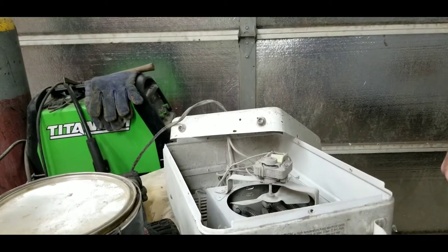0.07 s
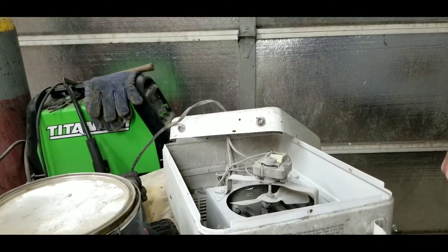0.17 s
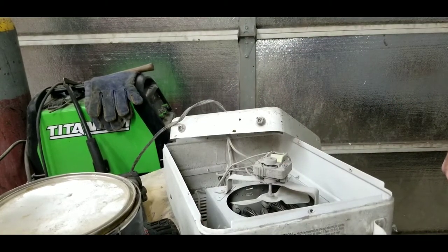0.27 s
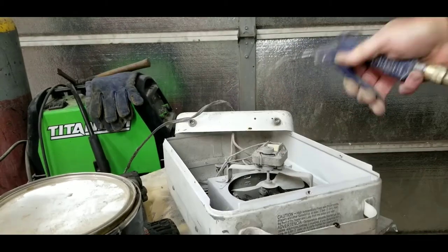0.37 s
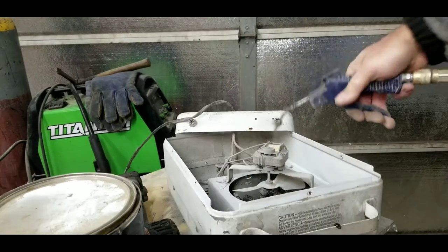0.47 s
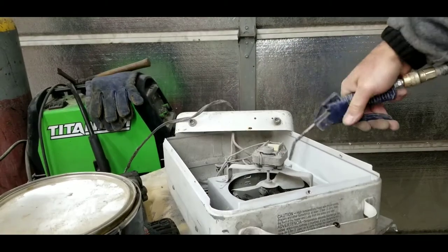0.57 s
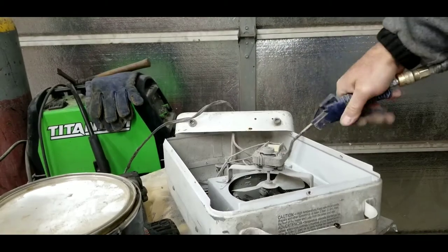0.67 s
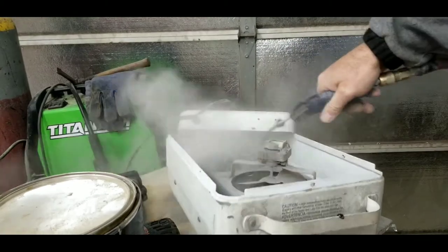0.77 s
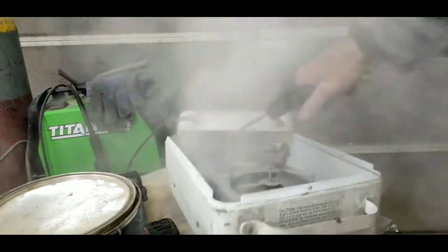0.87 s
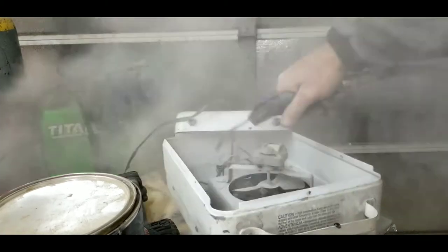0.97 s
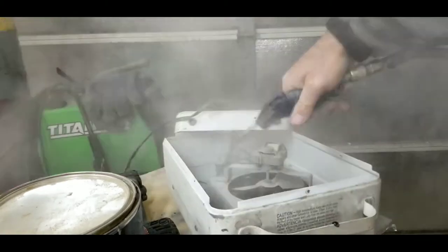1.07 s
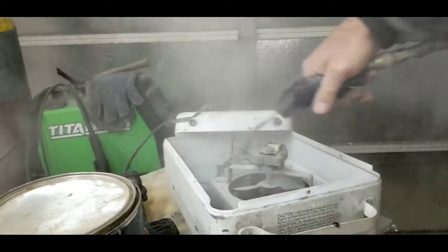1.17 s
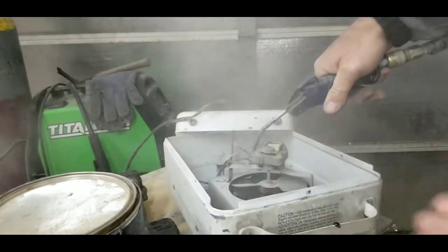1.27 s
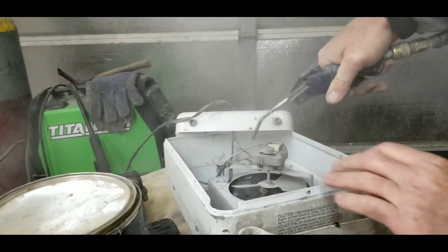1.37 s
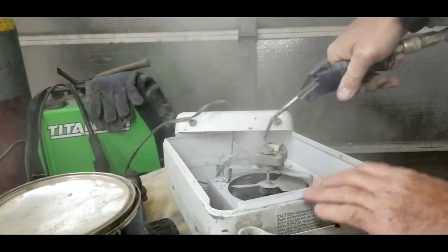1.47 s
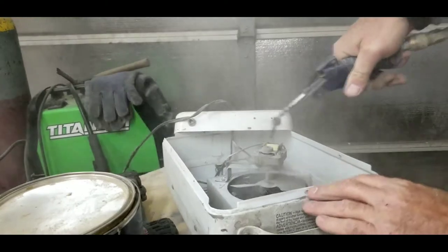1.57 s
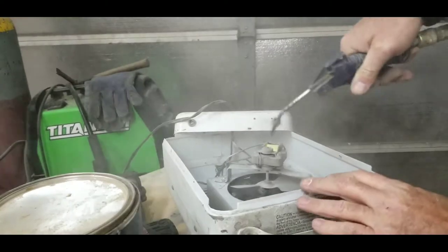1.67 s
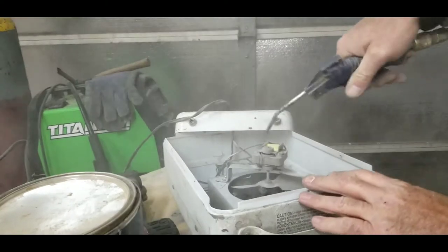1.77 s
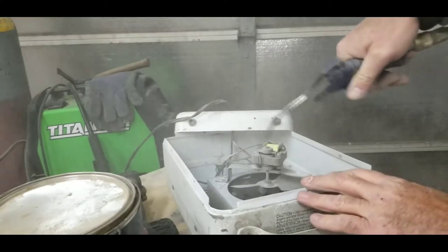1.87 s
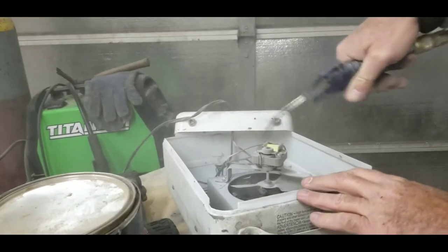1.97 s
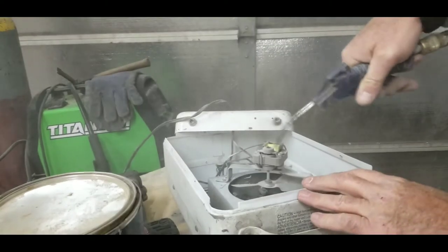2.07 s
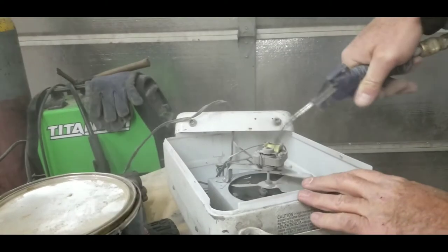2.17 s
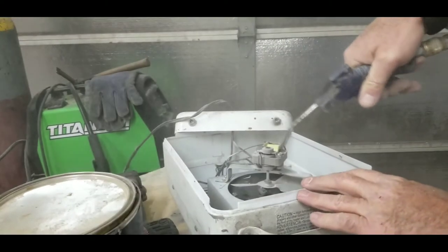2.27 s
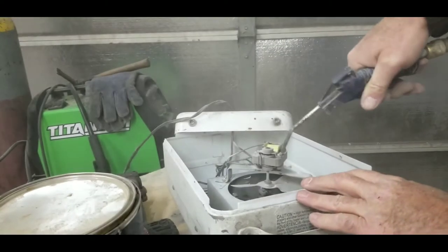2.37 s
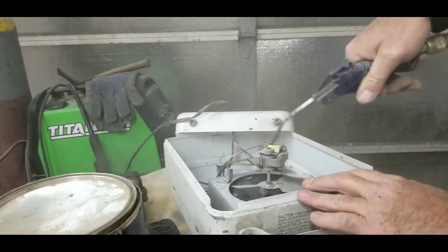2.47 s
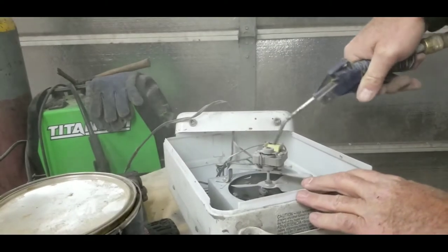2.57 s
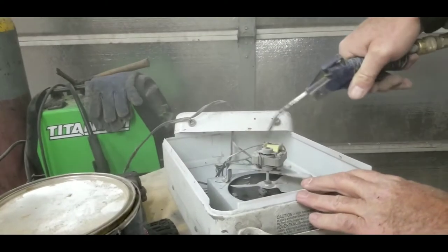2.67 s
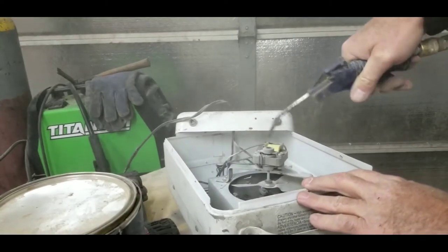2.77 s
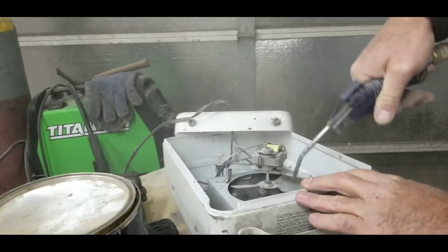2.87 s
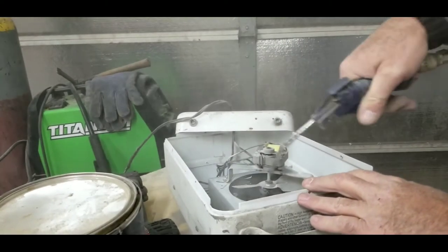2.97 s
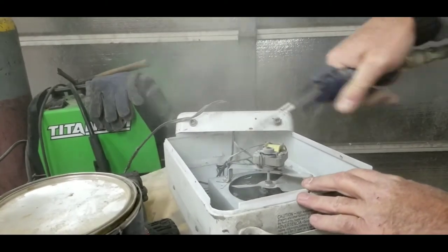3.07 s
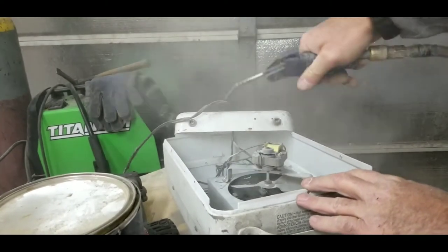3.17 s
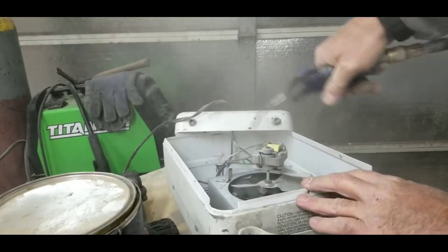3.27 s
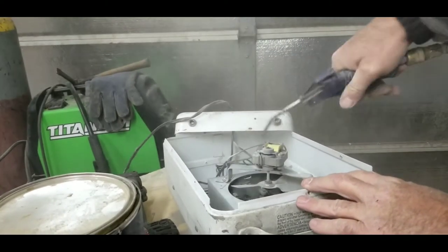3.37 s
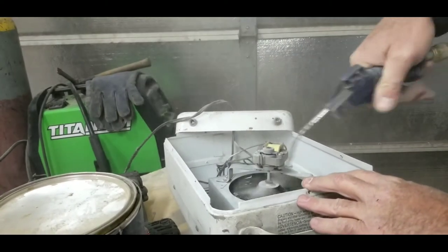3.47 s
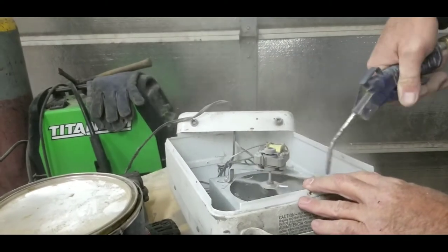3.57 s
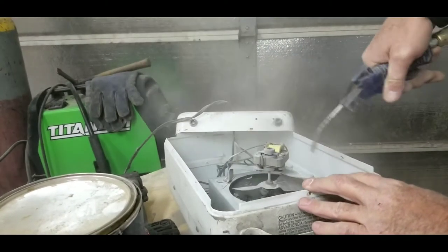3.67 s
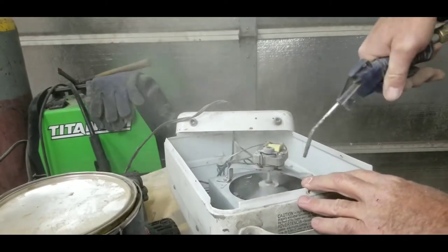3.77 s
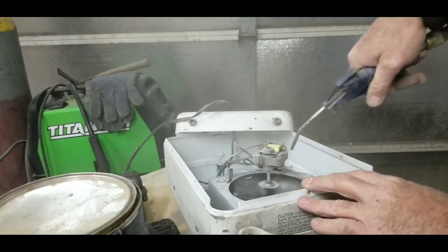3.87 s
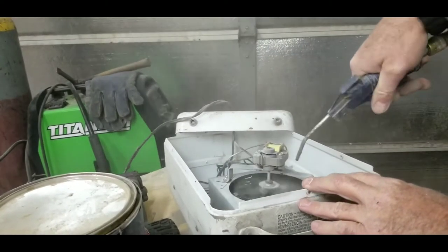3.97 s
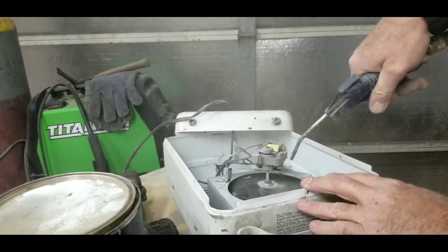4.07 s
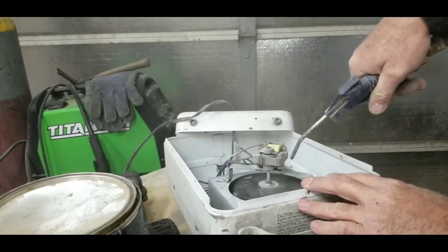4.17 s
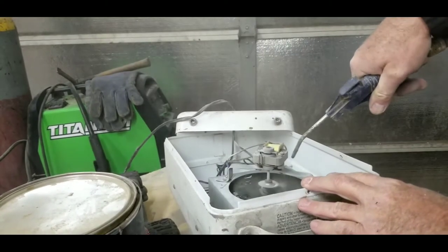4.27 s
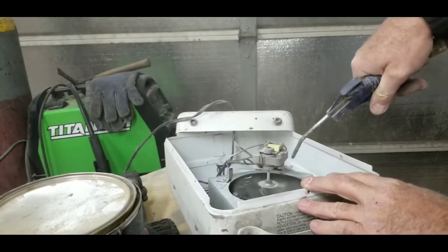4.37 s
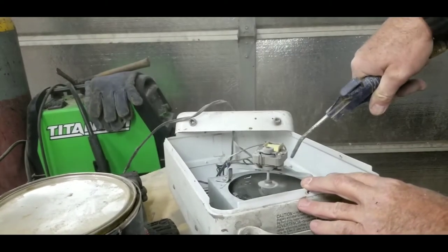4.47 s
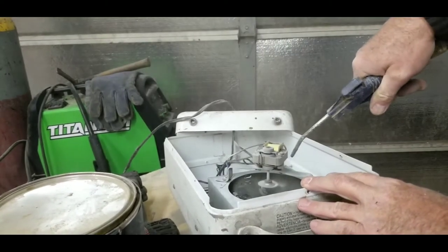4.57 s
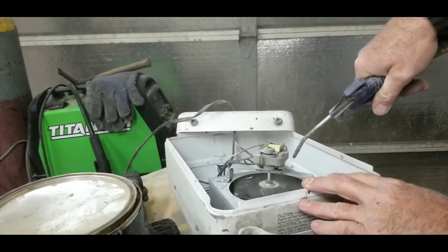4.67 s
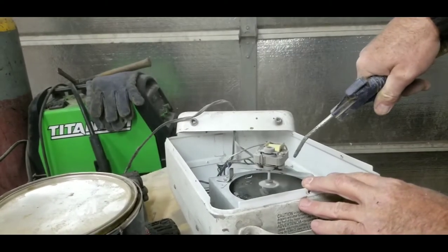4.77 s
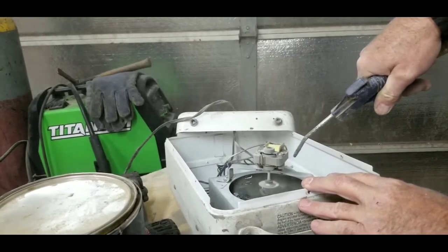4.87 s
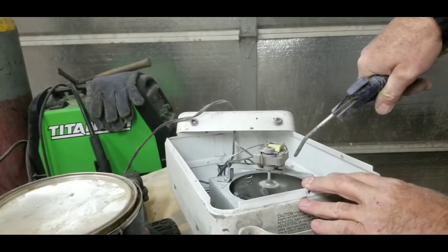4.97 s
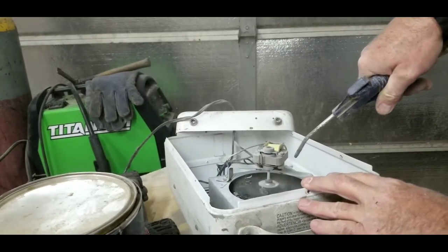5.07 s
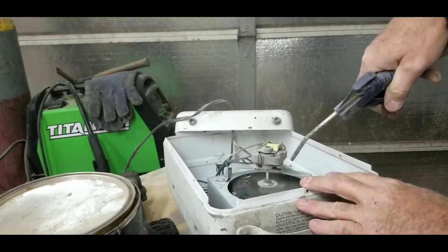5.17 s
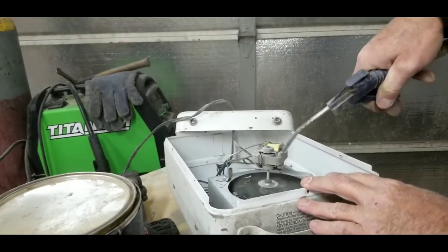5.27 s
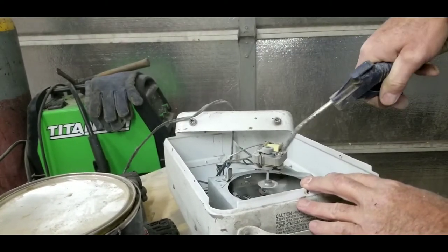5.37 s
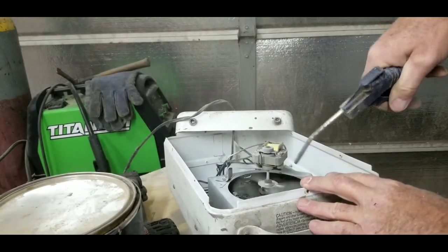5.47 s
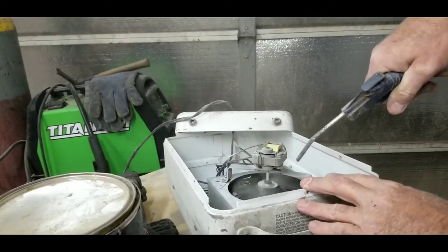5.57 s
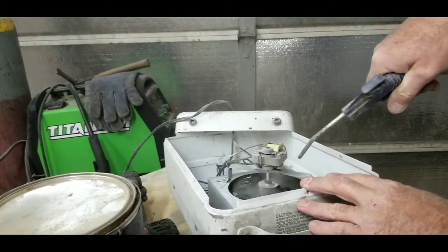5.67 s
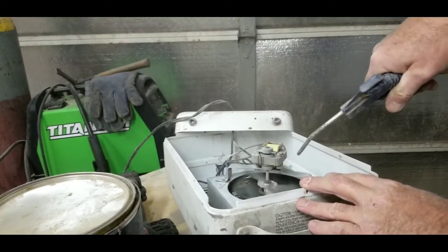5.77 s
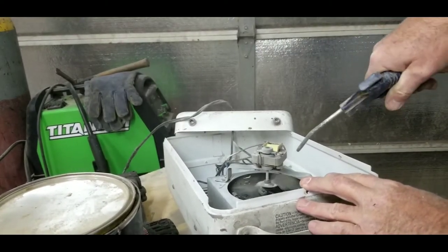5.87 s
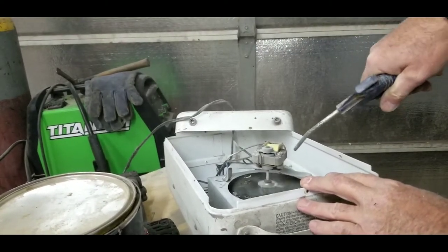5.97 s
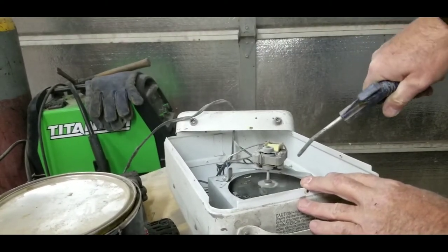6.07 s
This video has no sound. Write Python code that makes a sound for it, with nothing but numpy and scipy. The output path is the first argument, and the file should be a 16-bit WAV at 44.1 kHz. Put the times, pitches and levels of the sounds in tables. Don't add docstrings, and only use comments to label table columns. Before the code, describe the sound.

For the first 0.34 s there is only quiet low room rumble, faint rustle and tiny knocks; it drops abruptly to near silence. Around 0.5 s a thin air leak swells, and at 0.67 s a compressed-air gun snaps open with a dull thump. Its loud, bright hiss and roar swing unevenly until about 2.8 s, with fast swishes, flicks on wires and edges, and hollow booms in the metal box. From 2.8 to 3.9 s the blasts are longer and fuller. From 4.0 s the jet chops on fan blades, which climb quickly into a buzzy siren whine, steady from about 4.5 s. At 5.15 s the air stops sharply; the coasting rotor stirs soft air with tiny wavering whistles. A brief near-hush precedes another fluctuating blast at 5.49 s, faintly catching the fan again near 6 s. Close stereo microphones, modest garage echo.

```python
import sys
import numpy as np
from scipy import signal
from scipy.fft import rfft, irfft, next_fast_len
from scipy.io import wavfile
from scipy.ndimage import uniform_filter1d, map_coordinates

SR = 44100
rng = np.random.default_rng(int(sys.argv[2]) if len(sys.argv) > 2 else 0)


def store_pcm(level_fs):
    pcm = np.round(np.clip(level_fs, -1, 1) * 32767).astype(np.int16)
    wavfile.write(sys.argv[1], SR, np.atleast_2d(pcm).T)


def boost(x):
    u = np.asarray(x, float) / 20
    return 10 ** u


N = 270333

# opens [t/s], closes [t/s], attack [s]
TRIGGER = [
    (0.667, 5.152, 0.0086),
    (5.488, 6.2, 0.022),
]
RELEASE_S = 0.04
# hiss, roar, boom [level/dB]
FREE_JET_DB = [-50, -75, -65.5]
GLIDE_S = 0.026
# [t/s], length [s], roar [level/dB], aimed
# at the microphones [level/dB re roar], into the box [level/dB re roar]
LANDINGS = [(0.651, 0.162, -43, 4.5, -10), (0.803, 0.031, -54.5, 9, -6), (0.84, .05, -43, 3, -8.5),
            (0.89, 0.128, -40.5, 1.5, -8.5), (1.081, 0.086, -40.5, -2, -10.5), (1.246, 0.12, -39.5, -3, -19),
            (1.35, 0.093, -42.5, -4, -14.5), (1.529, 0.068, -47.5, 1.5, -8), (1.635, 0.06, -53.5, 9.5, -0.5),
            (1.74, .06, -55, 11, -8), (1.82, 0.55, -62, 14, -5), (1.02, .06, -64, 15, -4),
            (1.44, .09, -64, 14, -4), (1.69, .05, -64, 16, -4), (2.36, .05, -64, 13, -4),
            (2.31, 0.049, -44, -13, -10), (2.408, 0.064, -44.5, 7.5, -7.5), (2.487, 0.086, -54, 11, -3),
            (2.587, 0.042, -53, 4, -1), (2.661, 0.12, -52, 9, -7),
            (2.785, .025, -57, 7, -5), (2.809, .1, -46, 7, -10), (2.905, .03, -50, 7, -6),
         (3.08, .03, -50, 7, -6), (2.93, 0.15, -40, -1.5, -13.5), (3.1, 0.055, -50, 6.5, 1),
         (3.16, 0.097, -44.5, -1, -7), (3.26, .12, -43, 2, -11.5), (3.385, .06, -39.5, -2, -10),
         (3.445, .065, -41.5, -.5, -12), (3.52, .03, -45, 3, -11), (3.55, 0.035, -41, -5, -16),
         (3.585, .03, -47, 4, -15), (3.62, 0.045, -47, 1, -18), (3.665, .03, -43, 2, -11),
         (3.689, 0.076, -41.5, 3.5, -11), (3.765, .04, -64, 16, -4), (3.805, 0.033, -48.5, 7, -6),
         (3.841, 0.1, -37, -2, -18), (3.949, 0.46, -48, 7, -4.5), (4.4, 0.692, -43, 2, -9),
         (5.09, .12, -50, 8, -9), (5.46, 0.18, -42.5, 4, -12.5), (5.64, 0.06, -52, 12, -3),
         (5.7, .055, -51, 11, -11), (5.755, .105, -52, 12, -1), (5.76, .03, -60, 0, 10),
         (5.85, 0.071, -41.5, 3, -8), (5.92, 0.046, -49.5, 7, 0), (5.965, .03, -56, 0, 10),
         (5.98, 0.21, -39.5, -.5, -9)]
# [t/s], peak [level/dB], length [s], above 9 kHz [level/dB], under 1.5 kHz [level/dB]
SWIPES = [(0.726, -35, 0.013, -8, -12), (0.742, -36, 0.042, -12, -16), (0.781, -32.5, .028, -3, -14),
          (0.9, -35.5, 0.055, -10, -22), (0.976, -37.5, 0.016, -9, -7), (1.451, -38, 0.027, 4, -10),
          (1.515, -39, 0.013, 5, -5), (1.745, -42, 0.012, 3, -13), (1.773, -31.5, 0.014, -1, -9),
          (1.876, -33, 0.01, -3, -10), (1.885, -27.5, 0.012, -0.5, -13.5), (1.902, -40, .01, 0, -12),
          (2.025, -44, .015, 0, -12), (2.008, -34, .014, -2, -16), (1.987, -30, 0.037, -4, -18.5),
          (2.096, -27.5, 0.028, -1, -22), (2.125, -39, .022, -3, -14), (2.175, -64, 0.018, 7, -14),
          (2.204, -33, .01, -3, -8), (2.212, -28, 0.028, -0.5, -16), (2.243, -38, .01, -3, -12),
          (2.306, -37, .015, 0, -6), (2.343, -39, 0.015, 7, -11), (2.559, -41, 0.01, 10, -6),
          (2.621, -36, .012, -3, -12), (2.628, -24, 0.034, -7, -20), (2.664, -35, .012, -3, -14),
          (2.756, -34, 0.025, 2, -8), (2.811, -36, 0.01, 9, -9), (3.182, -31, 0.019, -20, -18),
          (3.209, -30, 0.036, -16, -19), (3.331, -44, .02, 13, -4), (5.801, -43, 0.018, -8, 3.5),
          (5.861, -38.5, 0.016, 9, -4)]
# [t/s], peak [level/dB], under 1.5 kHz [level/dB]
FLICKS = [(1.687, -38, -14), (1.794, -39, -16), (1.988, -31, -8), (2.015, -39, -13), (2.096, -35, -8),
          (2.15, -45, -6), (2.261, -37, -14), (2.713, -30, -9), (2.565, -38, -6), (2.818, -33, -14),
          (.928, -36, -14), (1.46, -42, -8), (5.996, -37, -2), (6.047, -36, -3), (6.068, -38, -3),
          (6.087, -35, -4), (2.965, -33, -16), (3.43, -35, -8)]
FLICK_S = 0.0023
# [f/Hz], [level/dB per Hz]
NOZZLE = [(880, -34), (1500, -23.5), (2310, -9), (5050, -6), (6500, -1.5), (8480, -2), (10400, 0.5),
          (12100, 0), (15600, -2)]
# [f/Hz], [level/dB per Hz]
ROAR = [(290, -100), (500, -23.5), (1190, -9), (2160, 2), (3100, -4), (3500, -6.5), (5500, 1), (7500, -3),
        (8470, -14), (9000, 1), (11700, -23), (19800, -120)]
# [f/Hz], [level/dB per Hz]
BOOM = [(15, -66), (25, -52), (108, -31), (170, -20), (286, -14), (323, -13.5), (457, -7.5), (798, -8.5),
        (1090, -3.5), (1440, -6.5), (1600, -8.5), (2080, -5.5), (3520, -120)]
# [f/Hz], correlation [-1 to 1]
ALIKE = [(60, 0.69), (99, 0.38), (160, 0.43), (270, 0.49), (450, 0.42), (740, 0.51), (1220, 0.61),
         (2010, 0.58), (3330, 0.53), (5500, 0.26), (9080, -0.1), (15000, 0.3)]
# [f/Hz], width [Hz], [level/dB]
SHEET_METAL = [(1120, 96, 2.2), (3120, 190, 2), (3730, 110, 1.5), (5070, 80, 1), (6700, 150, -4)]
FLOOR_SHARE = 0.38
# [t/s], delay [ms]
FLOOR_PATH = [(.67, 0.27), (1.0, 0.25), (1.3, 0.25), (1.65, 0.25), (1.9, 0.24), (2.2, 0.28), (2.33, 0.18),
              (2.65, 0.26), (3.2, 0.28), (3.45, 0.27), (3.9, .2), (4.5, 0.25), (5.15, 0.17), (5.6, 0.2),
              (6.1, 0.26)]
# [t/s], resonance [f/Hz], [level/dB]
POCKET = [(0.68, 4970, 3.5), (0.77, 3820, 3), (1.58, 4330, 4), (1.63, 5050, 3), (2.04, 4300, 2.5),
          (2.07, 4970, 6), (2.33, 4080, 2), (2.44, 5190, 6), (2.58, 4980, 4), (2.62, 3880, 2),
          (2.84, 5100, 6), (2.92, 3920, 3), (2.97, 4800, 3), (3.23, 3430, 5), (3.35, 5100, 3),
          (3.53, 3680, 3), (3.8, 5230, 4), (4.0, 4550, 3)]
POCKET_Q = 3.1

# [t/s], blade rate [f/Hz]
SPEED = [(3.99, 95.15), (4.048, 113.7), (4.142, 145.1), (4.242, 166.4), (4.382, 185.2), (4.542, 193.5),
         (4.614, 195.6), (5.304, 193.6), (5.396, 194), (5.47, 184)]
# [t/s], blade rate [f/Hz]
RESPIN = [(5.97, 62.1), (6.08, 106), (6.13, 129)]
# [t/s], grip [level/dB], slant lifting middle tones [level/dB], bite lifting top tones [level/dB]
GRIP = [
    [(3.99, -81, 10, -4), (4.05, -75, 11.5, -6), (4.11, -65.5, 1.5, -2), (4.17, -60, 3, -4),
     (4.215, -59, 2, 3), (4.26, -56.5, 4, 0), (4.37, -56, 2.5, -5), (4.45, -55.5, 3, 4),
     (4.542, -54, 1, -0.5), (4.65, -52, 0.5, 2), (4.75, -53, -3, -2), (4.85, -53.5, 0, -6),
     (4.95, -54.5, 3.5, -2), (5.03, -55, 0, 0), (5.11, -55, -12, 8), (5.14, -84, -22, 0),
     (5.2, -92, -22, 0), (5.29, -85, -16, 0), (5.38, -86, -16, 0), (5.46, -95, -10, 0)],
    [(5.97, -92, 4, 0), (6.03, -77, 16, 6), (6.08, -76, 15, 5), (6.13, -74, 17, 3)],
]
# multiple of blade rate [1], [level/dB]
BLADE = [(1, -21.5), (2, -2), (3, -8), (4, -6), (5, -1.5), (6, -13), (7, -11.5), (8, -10), (9, -18.5),
         (10, -19), (11, -15)]
# [f/Hz], width [Hz], [level/dB]
HOLLOW = [(150, 35, -3), (280, 22, 7.5), (334, 11, -11), (372, 5, -6), (395, 33, 7), (516, 36, 11),
          (573, 4.7, -20), (740, 10, -18), (952, 60, 8.5), (982, 4, -8), (1134, 40, 13), (1359, 5, -16),
          (1520, 53, 4)]
# [f/Hz], [level/dB per Hz]
SHAKE = [(40, -30), (70, -18), (100, 5), (140, -1), (220, -4), (400, -60)]

# [t/s], length [s], from [f/Hz], to [f/Hz], [level/dB], pitch swing per turn [0-1]
WHISTLE = [(5.2, .04, 1120, 1240, -76, .02), (5.245, .055, 1260, 1140, -76, .025),
           (5.33, .045, 1120, 1080, -71, 0), (5.41, .045, 800, 900, -73, .01),
           (5.455, .03, 770, 740, -77, 0), (5.2, .06, 3720, 3650, -69, .01),
           (5.265, .095, 3400, 3220, -66, .07), (5.362, .008, 2800, 2750, -71, 0),
           (5.378, .024, 3220, 3100, -67, .02), (5.42, .02, 3800, 3620, -68, 0),
           (5.457, .02, 3760, 3850, -72, 0), (5.262, .045, 3620, 3580, -69, 0),
           (5.31, .055, 3420, 3370, -69, 0), (5.375, .025, 6350, 6400, -74, 0),
           (5.32, .03, 5150, 5500, -77, .02), (5.405, .045, 2520, 2720, -74, .02),
           (5.455, .02, 2300, 2280, -76, 0), (5.44, .015, 4450, 4450, -79, 0)]
SHAFT_HZ, SHAFT_S = 44.5, 5.274

# [t/s], [level/dB], ring [f/Hz], t60 [s]
KNOCKS = [(0.178, -75, 770, .2), (0.18, -73, 587, .08), (0.268, -74, 444, .08), (0.305, -74, 800, 0.11),
          (0.325, -69, 550, 0.046), (0.6684, -35, 9700, 0.0063), (0.682, -53, 191, 0.045),
          (0.683, -54, 300, 0.035), (0.468, -76, 2150, 0.048)]
# [f/Hz], t60 [s]
GARAGE = [(150, 0.32), (300, 0.87), (2000, 0.33), (9000, 0.45), (15000, 0.32)]

# [f/Hz], [level/dB per Hz]
RUMBLE = [(12, -41), (20, -15), (59, 0.5), (118, -3.5), (209, -21), (228, -21.5), (600, -26), (780, -68),
          (1320, -120)]
# [f/Hz], [level/dB per Hz]
MURMUR = [(18, -46), (30, -23), (140, 3), (321, -10), (346, -24), (600, -13), (780, -36), (1320, -120)]
# [t/s], [level/dB]
ROOM = [(0, -72), (.15, -71), (.19, -65), (.29, -64), (.334, -70)]
# [t/s], rise [s], [level/dB], t60 [s], brightness [level/dB]
RUSTLES = [(.172, 0.017, -75, 0.32, -3), (.29, .045, -89, 1.1, 4), (.467, .001, -78.5, 0.16, -2)]
# [f/Hz], [level/dB per Hz]
LEAK = [(150, -49), (250, -16), (991, -1.5), (1090, -5.5), (1470, -3.5), (2020, -4), (11000, -11),
        (14300, -41), (22000, -120)]
# [t/s], [level/dB]
VALVE = [(.41, -106), (.467, -97), (.492, -86), (.502, -80), (.509, -66), (.55, -62.5), (.59, -60),
         (.63, -62.5), (.66, -70)]
LEAK_BRIGHTENS = 3.7
# [f/Hz], [level/dB per Hz]
COAST = [(150, -70), (250, -27), (377, -34), (734, -31), (1130, -14), (1530, -28), (1950, -16), (3300, -17),
         (4320, -14.5), (11000, -21.5), (14300, -56), (22000, -120)]
# [t/s], rise [s], [level/dB], t60 [s]
HISS_SWELL = (4, 0.7, -59, .3)
SEEP = (5.25, .08, -83, 1.2)
HUSH_DB = [-81, -85.5]
CUT_S, SHUT_S = 0.339, 5.462

# [f/Hz], [level/dB]
LEAN = [(60, -3), (180, -1), (550, -0.5), (1650, 0.0), (4970, -0.5), (15000, -2)]
TOP_HZ = 15670


def unit(x):
    return x / np.sqrt(np.mean(x ** 2) + 1e-20)


def along(points, hz):
    f, v = np.transpose(points)
    return np.interp(np.log(hz + 1), np.log(f + 1), v)


def peaks(table, hz):
    return sum(db / (1 + ((hz - centre) / width) ** 2) for centre, width, db in table)


def curves(tables):
    t = np.arange(N) / SR
    s, *columns = np.transpose(np.concatenate(tables))
    gate = sum((t >= rows[0][0]) & (t <= rows[-1][0] + 0.011) for rows in tables) > 0
    return [np.interp(t, s, column) for column in columns] + [uniform_filter1d(gate * 1.0, size=60)]


def wobble(rate, size=N):
    knots = rng.standard_normal(int(size * rate / SR) + 4)
    return map_coordinates(knots, [np.arange(size) * rate / SR])


def puff(s, rise, db, t60):
    t = np.arange(N) / SR - s
    return np.clip(t / rise, 0, 1) * boost(db - 60 * np.clip(t - rise, 0, 9) / t60)


def filtered(x, response):
    m = next_fast_len(N + SR // 2)
    return irfft(rfft(x, m) * response(np.fft.rfftfreq(m, 1 / SR)), m)[..., :N]


def rush(spectrum, alike, patchy_db):
    z = signal.stft(rng.standard_normal((2, N)), nperseg=256)[2]
    patches = uniform_filter1d(rng.standard_normal(z.shape[1:]), size=5, axis=0)
    patches = uniform_filter1d(patches, size=10, axis=1)
    pair = signal.istft(z * boost(patchy_db * unit(patches)), nperseg=256)[1][:, :N]

    def response(hz):
        turn = np.arccos(np.clip(along(alike, hz), -1, 1)) / 2
        return boost(along(spectrum, hz)) * [np.cos(turn), np.sin(turn)]

    mid, side = filtered(pair, response)
    return unit(np.array([mid + side, mid - side]))


def jet(chop):
    (face, land, box), valve = aim()
    edge, bright, deep = swipes()
    nick, thud = flicks()
    shake = wobble(35)
    metal = lambda hz: boost(peaks(SHEET_METAL, hz))
    ringing = pocket(bounced(filtered(rush(ROAR, ALIKE, patchy_db=2.45), metal)))
    hollow_air = filtered(rush(BOOM, ALIKE, patchy_db=1.5), metal)
    hiss = np.hypot(face * boost(3.0 + 0.1 * shake), 1.24 * bright) * rush(NOZZLE, ALIKE, patchy_db=2.0)
    roar = np.hypot(land * boost(-3.5 + 1.66 * shake), edge + nick) * ringing
    boom = np.hypot(box * boost(-3.5 + 2.53 * wobble(30)), deep + thud) * hollow_air
    return valve * (chop * (hiss + roar) + boom)


def aim():
    t = np.arange(N) / SR
    power = boost(FREE_JET_DB)[:, None] ** 2 * np.ones(N)
    for s, length, db, face_db, deep_db in LANDINGS:
        span = slice(round((s - GLIDE_S) * SR), round((s + length + GLIDE_S) * SR))
        inside = np.minimum(t[span] - s, s + length - t[span])
        share = np.clip(inside / GLIDE_S + 0.5, 0, 1)
        power[:, span] += boost(db + np.array([[face_db], [0], [deep_db]])) ** 2 * share ** 1.26
    valve = 0
    for opens, closes, attack in TRIGGER:
        release = boost(-60 * np.clip(t - closes, 0, 9) / RELEASE_S)
        valve = valve + np.clip((t - opens) / attack, 0, 1) ** 2 * release
    return np.sqrt(power), valve


def swipes():
    gains = np.zeros((3, N + SR))
    t = np.arange(SR // 5) / SR
    for s, db, length, bright_db, deep_db in SWIPES:
        shape = np.clip(t / 0.0065, 0, 1) * boost(-60 * np.clip(t - length, 0, 1) / 0.024)
        levels = boost(db - 9.0 + np.array([[0], [bright_db], [deep_db]]))
        gains[:, round((s - 0.003) * SR):][:, :len(t)] += levels * shape
    return gains[:, :N]


def flicks():
    gains = np.zeros((2, N + SR))
    t = np.arange(SR // 50) / SR - 4 * FLICK_S
    bump = np.exp(-0.5 * (t / FLICK_S) ** 2)
    for s, db, deep_db in FLICKS:
        levels = boost(db - 11.5 + np.array([[0], [deep_db]]))
        gains[:, round((s - 3 * FLICK_S) * SR):][:, :len(t)] += levels * bump
    return gains[:, :N]


def bounced(x):
    t = np.arange(N)
    late = t - curves([FLOOR_PATH])[0] * SR / 1000
    return unit(x + FLOOR_SHARE * np.array([np.interp(late, t, side) for side in x]))


def pocket(x):
    hz, t, z = signal.stft(x, SR, nperseg=256)
    s, centre_hz, db = np.transpose(POCKET)
    off = (hz[:, None] / np.interp(t, s, centre_hz) - 1) * POCKET_Q
    gain = boost(np.interp(t, s, db) / (1 + off ** 2))
    return unit(signal.istft(z * gain, SR, nperseg=256)[1][:, :N])


def fan():
    rate_hz, on = curves([SPEED, RESPIN])
    low_db, slant_db, bite_db, _ = curves(GRIP)
    turn = 2 * np.pi * np.cumsum(rate_hz * (1 + 0.0007 * wobble(17))) / SR
    go = int(SPEED[0][0] * SR)
    tones = 0
    for k, db in BLADE:
        upper = np.clip((k - 2) / 3, 0, 1)
        grip_db = (low_db + upper * slant_db + (k > 5) * bite_db)[go:]
        hollow_db = peaks(HOLLOW, k * rate_hz[go:]) - peaks(HOLLOW, k * 195.2)
        level = boost(db + grip_db + hollow_db + 1.1 * wobble(16, size=N - go))
        tones = tones + level * np.cos(k * turn[go:] + 0.2 * wobble(9, size=N - go))
    siren = on * boost(5.5) * np.pad(tones, (go, 0)) * boost([[-0.6], [0.6]])
    chop = 1 + np.clip(boost(low_db + 37), 0, 0.6) * on * (np.cos(turn) + 0.5 * np.cos(2 * turn))
    return siren + judder(rate_hz, low_db, on), chop


def judder(rate_hz, low_db, on):
    shove = sum(puff(s, 0.01, -84, 1.2) for s, *_ in TRIGGER) + puff(TRIGGER[0][0], 0.008, -72, 0.6)
    spin = on * boost(low_db - 25) * (rate_hz / 195) ** 12
    return (spin + shove) * rush(SHAKE, [(60, 0.66)], patchy_db=3.0)


def whistle():
    out = np.zeros((2, N))
    for s, length, from_hz, to_hz, db, swing in WHISTLE:
        start = s - 0.006
        n = round((length + 0.013) * SR)
        shaft = np.cos(2 * np.pi * SHAFT_HZ * (start - SHAFT_S + np.arange(n) / SR))
        pitch_hz = np.linspace(from_hz, to_hz, n) * (1 + swing * np.tanh(2.5 * shaft))
        carrier = np.exp(2j * np.pi * np.cumsum(pitch_hz) / SR)
        width = 0.06 * to_hz
        flutter = np.array([1.2 + wobble(width, size=n) + 1j * wobble(width, size=n) for _ in range(2)])
        flutter = flutter + 0.5 * flutter[::-1]
        rub = signal.windows.tukey(n, 0.3) * boost(db - 9.5) * (1 + 0.6 * shaft)
        out[:, round(start * SR):][:, :n] += rub * (flutter * carrier).real
    return out


def knocks():
    out, t = np.zeros(N + SR), np.arange(SR // 3) / SR
    for s, db, hz, t60 in KNOCKS:
        ring = boost(db - 60 * t / t60) * np.sin(2 * np.pi * hz * t)
        out[round(s * SR):][:len(t)] += ring * (1 - np.exp(-t * hz / 0.5))
    return out[:N]


def bench(x):
    out, angle = 0, np.pi * 0.6 * wobble(2.6)
    for share in (np.cos(angle), np.sin(angle)):
        delays = rng.uniform(0.000611, 0.011, (2, 7))
        sizes = rng.uniform(0.14, 1, (2, 7)) * rng.choice([-1, 1], (2, 7))
        echo = lambda hz: (sizes[..., None] * np.exp(-2j * np.pi * hz * delays[..., None])).sum(axis=1)
        out = out + filtered(np.tile(share * x.mean(axis=0), (2, 1)), echo)
    return out


def garage(x):
    hz, t, z = signal.stft(rng.standard_normal((2, SR // 2)), SR, nperseg=256)
    tail = signal.istft(z * boost(-60 * t / along(GARAGE, hz)[:, None]), SR, nperseg=256)[1]
    return signal.fftconvolve(x, tail / np.linalg.norm(tail[0]), axes=1)[:, :N]


def quiet():
    t = np.arange(N) / SR
    leak_db, back = curves([VALVE])
    early = boost(-60 * np.clip(t - CUT_S, 0, 9) / 0.0037)
    still_open = boost(-60 * np.clip(t - SHUT_S, 0, 9) / 0.085)
    rustle = np.array([puff(*row[:4]) * (early if row[0] < CUT_S else back) for row in RUSTLES])

    valve, rotor = (rush(air, [(500, 0.4), (5000, 0.069)], patchy_db=3.0) for air in (LEAK, COAST))
    air = early * boost(HUSH_DB[0]) + rustle.sum(axis=0) + back * boost(leak_db)
    leak = boost(-0.3) * (air * valve + still_open * puff(5.14, 0.018, -63.5, 3.5) * rotor)

    treble = early * boost(HUSH_DB[1]) + boost([row[4] for row in RUSTLES]) @ rustle
    treble = treble + still_open * (puff(*HISS_SWELL) + puff(*SEEP))
    treble = treble + back * (boost(-106) + boost(-68.0 + LEAK_BRIGHTENS * (leak_db + 61.0)))
    hiss_color = [(200, -17), (1000, -14.0), (4000, 4.0), (8000, 2.5), (12000, 5.0), (16000, 0.5)]
    hiss = boost(5.0) * treble * rush(hiss_color, [(60, 0)], patchy_db=0.5)
    return room_rumble(early, back) + leak + hiss


def room_rumble(early, back):
    room_db, _ = curves([ROOM])
    before, after = (rush(room, [(60, 1.0), (400, 0.41)], patchy_db=1.5) for room in (RUMBLE, MURMUR))
    returned = back * (boost(-95) * before + puff(0.494, 0.027, -76.5, 0.8) * after)
    return early * boost(room_db) * before + returned + puff(0.68, 0.008, -75, 0.5) * before


def scene():
    siren, chop = fan()
    air = jet(chop) + whistle()
    t = np.arange(N) / SR
    heard = (t < CUT_S) | (t > CUT_S + 0.1)
    near = air + boost(-14.5) * bench(air) + siren
    far = boost(-10.5) * garage(air + 0.14 * siren)
    return near + far + quiet() + heard * knocks()


def low_pass(x):
    return signal.sosfilt(signal.butter(12, 15670, fs=SR, output="sos"), x)


def record(dry):
    def microphones(hz):
        port_db = peaks([(8500, 350, -3), (8000, 900, -1.5)], hz)
        lean_db = along(LEAN, hz) * np.array([[0.5], [-0.5]])
        return boost(lean_db + port_db) * np.clip((TOP_HZ - hz) / 120 + 0.5, 0, 1)

    wet = filtered(dry, microphones)
    mix = wet / (1 + (wet / 0.085) ** 4) ** 0.25
    return low_pass(mix)


dry = scene()
out = record(dry)
store_pcm(out)
```